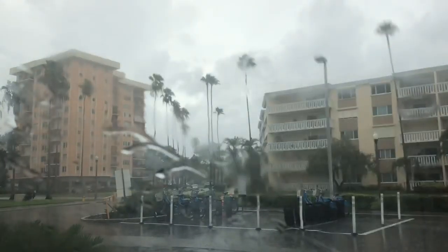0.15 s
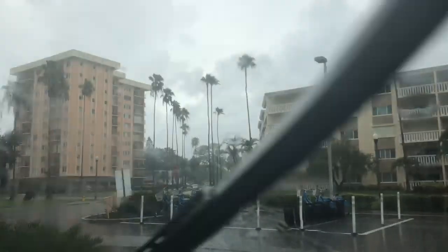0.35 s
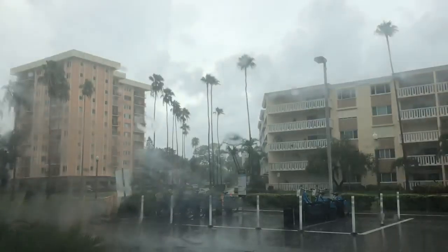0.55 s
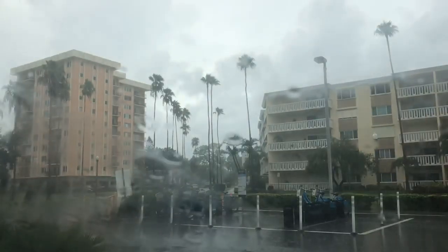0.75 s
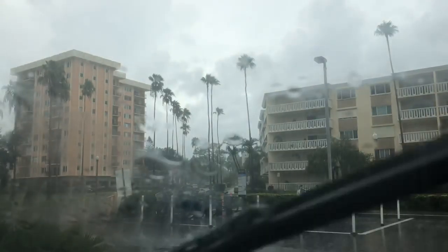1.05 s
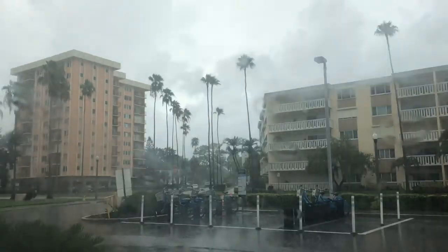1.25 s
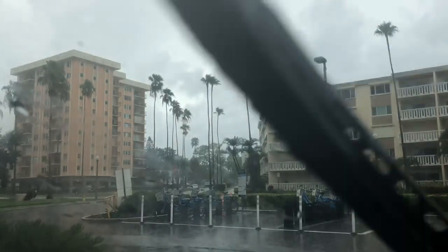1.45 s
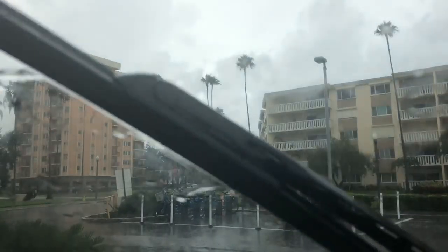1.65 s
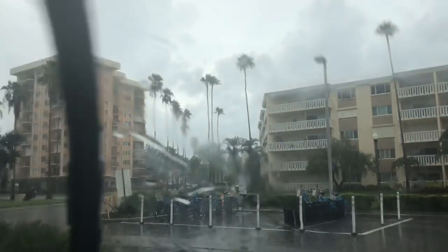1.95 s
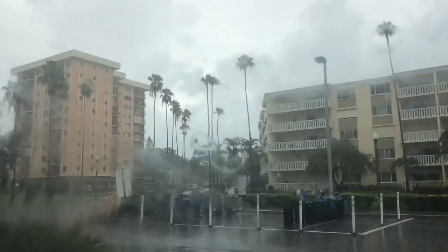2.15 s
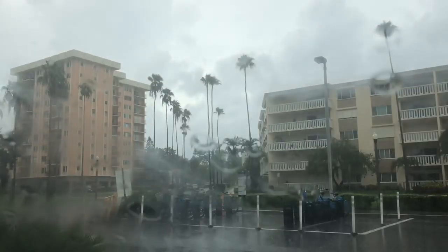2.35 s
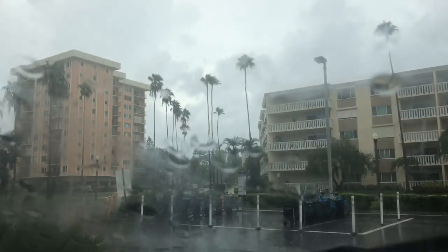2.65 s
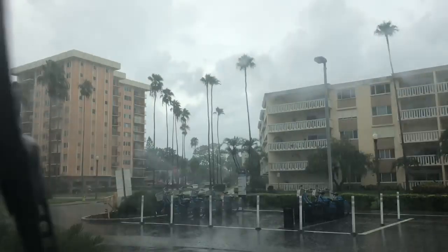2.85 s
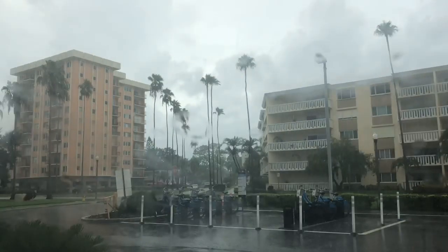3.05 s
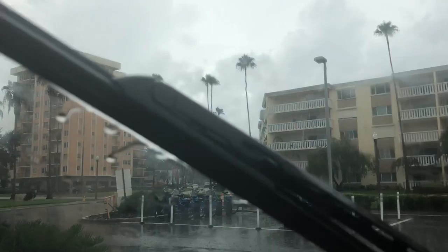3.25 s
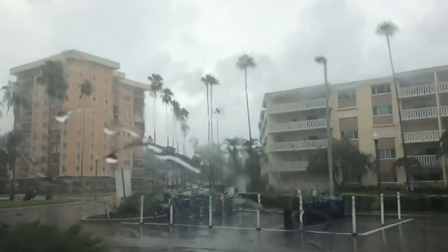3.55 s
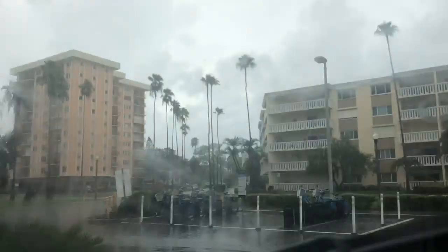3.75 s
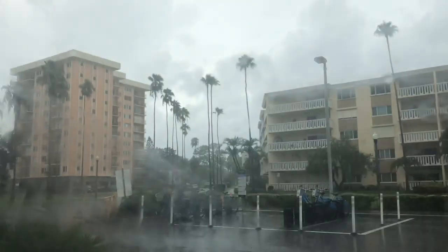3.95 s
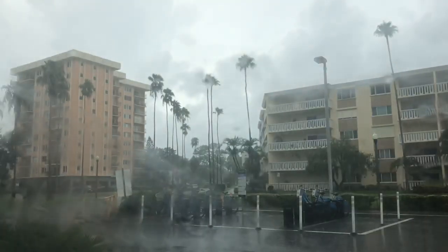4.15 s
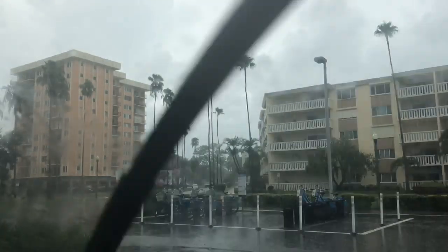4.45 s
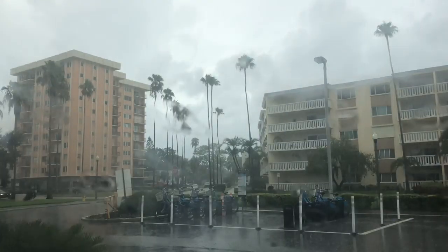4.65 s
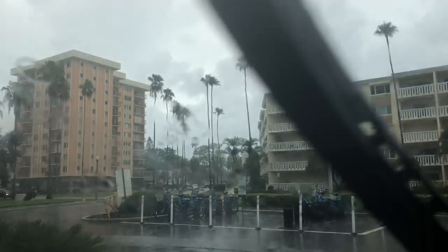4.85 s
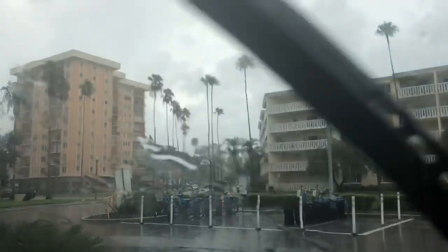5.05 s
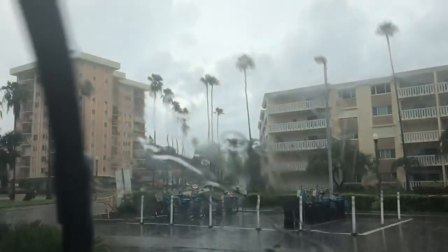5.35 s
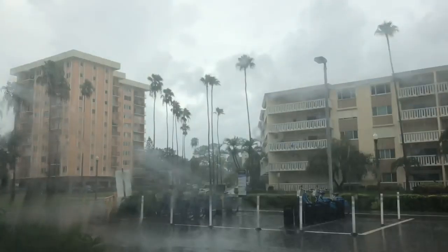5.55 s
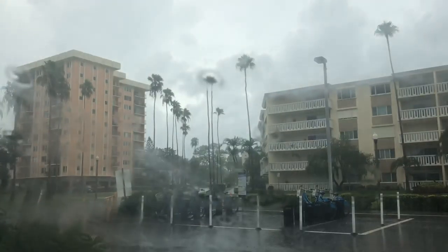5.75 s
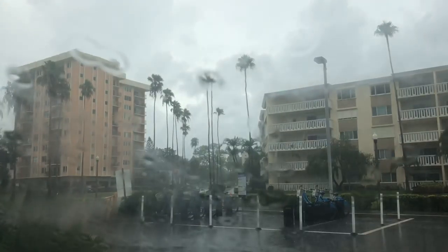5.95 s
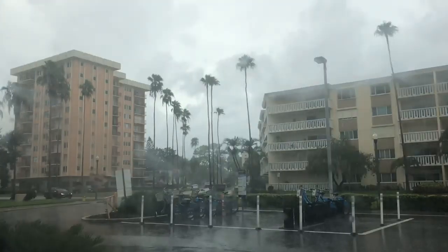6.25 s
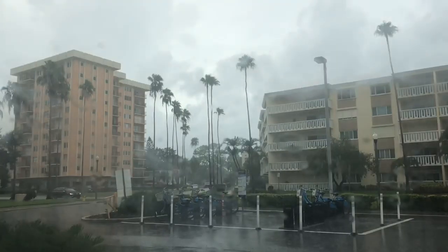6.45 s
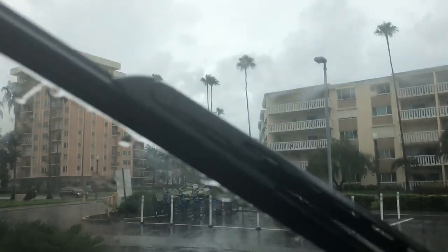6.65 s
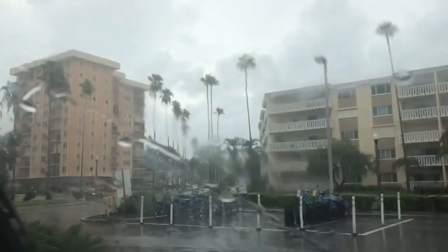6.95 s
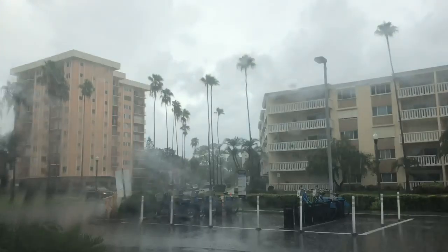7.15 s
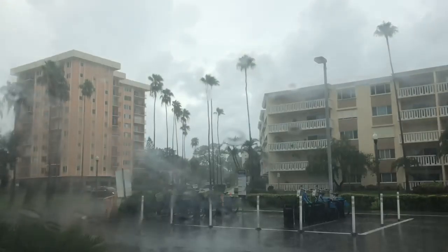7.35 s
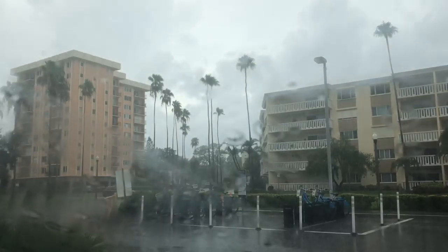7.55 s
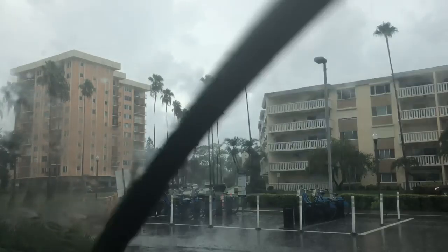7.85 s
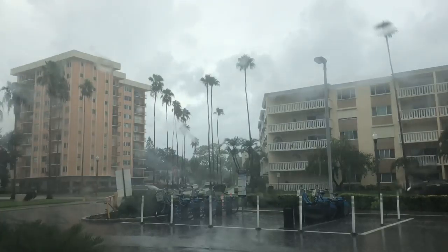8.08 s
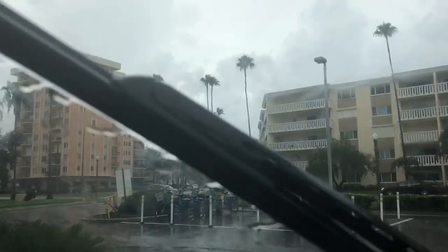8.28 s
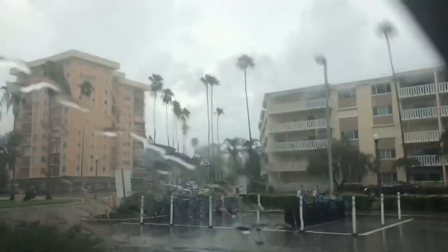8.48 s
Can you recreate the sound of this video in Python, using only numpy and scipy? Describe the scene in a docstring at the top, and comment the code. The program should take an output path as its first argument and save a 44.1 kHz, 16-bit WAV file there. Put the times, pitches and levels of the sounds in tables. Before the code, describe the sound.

Steady rain falls on a parked car, heard from the front seat. Small drops tick on the windshield and patter dully on the roof over a dense wash. The wipers run throughout in an even rhythm, swishing across the glass with a low motor hum and giving a muffled thump at each turn. Now and then a single heavy drop smacks the windshield.

```python
"""Steady rain on a parked car, heard from the front seat with the wipers running.
From the start, drops tick on the windshield and patter on the roof over a dense wash. Almost at once
the blades turn at the top: the rubber flips and the linkage thumps the car body. They swish down with
the motor humming, thump again at the foot of the glass, then drag back up as the first heavy drop
smacks the glass. The wipers repeat this about every 1.7 seconds, with more heavy drops now and then."""
import sys
import numpy as np
from scipy import signal
from scipy.fft import rfft, irfft, next_fast_len
from scipy.io import wavfile

SR = 44100
rng = np.random.default_rng(int(sys.argv[2]) if len(sys.argv) > 2 else 0)


def output_pcm(signal):
    """Save a mono or channel-first signal as 16-bit PCM at the path in sys.argv[1].

    Samples are clipped to [-1, 1] before scaling.
    """
    pcm = np.clip(np.atleast_2d(signal).T, -1, 1) * 32767
    wavfile.write(sys.argv[1], SR, np.round(pcm).astype(np.int16))


N = 424241
TIME = np.arange(N) / SR


def amp(db):
    """Turns decibels into a number to multiply by."""
    return 10 ** (np.asarray(db) / 20)


def unit(x):
    """Scales a signal to an average strength (rms) of 1."""
    return x / np.sqrt(np.mean(x ** 2) + 1e-20)


def add(mix, time_s, sound):
    """Lays a sound into the mix at the given time."""
    start = round(time_s * SR)
    sound = sound[max(-start, 0):]
    part = mix[max(start, 0):][:len(sound)]
    part += sound[:len(part)]


def colour(x, tone):
    """Makes low and high pitches louder or softer, following a tone table."""
    size = next_fast_len(len(x) + 4096, True)
    hz, db = np.transpose(tone)
    log_hz = np.log(abs(np.fft.fftfreq(size, 1 / SR)) + 1)
    log_gain = np.log(amp(np.interp(log_hz, np.log(hz), db)))
    response = np.exp(np.conj(signal.hilbert(log_gain)))  # rings after a hit, never before
    return irfft(rfft(x, size) * response[:size // 2 + 1], size)[:len(x)]


def noise(tone):
    """Steady noise of strength 1 with the given tone."""
    return unit(colour(rng.standard_normal(N), tone))


def gusts(fastest_hz, count=24):
    """Slow waves add up to a random rise and fall of strength 1."""
    t, hz = TIME[::128], fastest_hz * np.geomspace(1 / 20, 1, count)[:, None]
    waves = np.sin(2 * np.pi * (hz * t + rng.random((count, 1)))) / hz ** .25
    return np.interp(TIME, t, unit(waves.sum(0)))


def splash(crack_s, ring_s, ring_db):
    """One drop: a brief crack, then the panel and the cabin ring faintly."""
    t = np.arange(2048) / SR
    fade = np.exp(-t / crack_s) + amp(ring_db) * np.exp(-t / ring_s)
    burst = rng.standard_normal(len(t)) * fade
    return burst / np.linalg.norm(burst)


def landings(per_s, spread_db, cap):
    """One spike per drop, at random times; the biggest is cap * spread_db above the smallest."""
    sizes = amp(spread_db * np.minimum(rng.exponential(1, N), cap))
    return sizes * (rng.random(N) < per_s / SR)


def patter(drops, tone, spots=20, **shape):
    """Drops land on random spots that each ring in their own way."""
    spot = rng.integers(0, spots, N)
    hits = sum(signal.oaconvolve(drops * (spot == k), splash(**shape))[:N] for k in range(spots))
    return unit(colour(hits, tone))


# Tone of the wash: (pitch [Hz], level [dB]). Levels in all tables are relative.
WASH_TONE = [(25, -26), (60, -3.5), (150, 0.5), (320, 3), (480, 1.5), (720, -4.5), (840, -2), (1250, -5),
             (1450, -8.5), (3900, -11), (6000, -18), (9000, -31.5), (13000, -44), (16000, -40)]
def wash(gust):
    """The dense rush of rain behind the single drops."""
    return amp(-48 + 0.6 * gust) * noise(WASH_TONE)


# Tone of drops on the roof: (pitch [Hz], level [dB])
ROOF_TONE = [(150, -20.5), (300, 2), (500, 0), (850, 0), (1230, -3.5), (1420, -10), (2500, -14.5),
             (5000, -38.5)]
def roof_patter(gust):
    """Many drops drum dully on the roof."""
    drops = landings(per_s=550, spread_db=4, cap=3.1)
    return amp(-51.5 + gust) * patter(drops, ROOF_TONE, crack_s=0.0034, ring_s=0.015, ring_db=-15)


def roof_taps(gust, fade_s=0.0072, rise_s=0.0015, patches=16):
    """Heavier drops each ring one patch of the roof with a hollow note."""
    t = np.arange(2048) / SR
    drops = landings(per_s=26, spread_db=3, cap=2)
    patch, taps = rng.integers(0, patches, N), np.zeros(N)
    for k, hz in enumerate(np.geomspace(560, 1300, patches)):
        note = np.sin(2 * np.pi * hz * t) * np.exp(-t / fade_s) * (1 - np.exp(-t / rise_s))
        taps += signal.oaconvolve(drops * (patch == k), note)[:N]
    return amp(-57.5 + gust) * unit(taps)


# Tone of drops on the windshield: (pitch [Hz], level [dB])
GLASS_TONE = [(300, -5), (900, -1.5), (1500, 0.5), (2600, -0.5), (3700, -0.5), (4600, -4), (6500, -11),
              (9000, -15.5), (12500, -25), (16000, -43)]
def glass_ticks(gust):
    """Small drops tick on the windshield."""
    drops = landings(per_s=900, spread_db=4.5, cap=3.58)
    ticks = patter(drops, GLASS_TONE, crack_s=0.00041, ring_s=0.0059, ring_db=-6.5)
    return amp(-50 + 0.59 * gust) * ticks


# Tone of the spray: (pitch [Hz], level [dB])
SPRAY_TONE = [(1000, -12), (3000, -7), (6000, 2), (10000, -3), (16000, -7)]
def fine_spray(gust):
    """Fine spray lands with sharp, bright clicks."""
    drops = landings(per_s=200, spread_db=5, cap=4.2)
    return amp(-67 + 0.7 * gust) * patter(drops, SPRAY_TONE, crack_s=0.0003, ring_s=0.005, ring_db=-10)


# Where the roof and glass ring: (pitch [Hz], width [Hz], level [dB])
PANEL_NOTES = [(621, 51, -7.5), (831, 64, -2), (1026, 98, -6.5), (1255, 39, -4.5), (2440, 97, -22),
               (3605, 90, -5.5), (3930, 150, -17)]
def panels(x):
    """Roof and glass boost the rain at the pitches where they ring."""
    return x + sum(amp(db) * signal.lfilter(*signal.iirpeak(hz, hz / width, fs=SR), x)
                   for hz, width, db in PANEL_NOTES)


# How hard it rains: (time [s], level [dB])
RAIN_STRENGTH = [(0, 0.5), (.95, -1.05), (1.3, 1.5), (1.7, -.6), (3.1, -0.66), (5.2, 0.5), (6.8, -0.07),
                 (9.6, 0.34)]
def rain():
    """All layers of the steady rain rise and fall with the same gusts."""
    gust = gusts(fastest_hz=14)
    strength_db = np.interp(TIME, *np.transpose(RAIN_STRENGTH))
    layers = wash(gust) + roof_patter(gust) + glass_ticks(gust) + fine_spray(gust) + roof_taps(gust)
    return amp(strength_db) * panels(layers)


# Heavy drops on the windshield: (time [s], smack level [dB], spray level [dB])
HEAVY_DROPS = [(1.4626, -34, -50), (2.4246, -29, -48), (2.8125, -33, -54), (3.1685, -31.5, -59),
               (3.904, -30, -53), (4.0178, -39, -58), (4.9721, -48, -61), (5.9888, -31, -50),
               (6.1075, -30, -48), (6.132, -43, -50), (7.3997, -32, -46), (7.8332, -34, -58),
               (8.867, -27, -51), (8.9336, -32, -56), (9.179, -30.5, -55), (9.4213, -33, -59)]
def heavy_drops():
    """Single heavy drops smack the glass and burst into bright spray."""
    smack, spray = np.zeros(N), np.zeros(N)
    for time_s, smack_db, spray_db in HEAVY_DROPS:
        drop = splash(crack_s=0.00098, ring_s=0.0055, ring_db=-4)
        add(smack, time_s, amp(smack_db) * drop)
        add(spray, time_s, amp(spray_db) * drop)
    return amp(20) * colour(smack, GLASS_TONE) + amp(25) * colour(spray, SPRAY_TONE)


# The wipers keep strict time: first turn at the top, one trip down and back, the way down alone
FIRST_TURN_S, CYCLE_S, DOWN_S = 0.0523, 1.6858, 0.8215
# Tones of dragging rubber, the motor and swept water: (pitch [Hz], level [dB])
DRAG_TONE = [(20, -57), (45, -12), (80, -6.5), (105, -4.5), (120, 4), (145, -3.5), (200, -12), (400, -54.5)]
MOTOR_TONE = [(60, -29), (130, -14), (175, -3.5), (200, -1), (245, -10), (290, -11), (380, -20.5),
              (800, -52)]
SWISH_TONE = [(300, -31), (600, -7.5), (850, -5.5), (1250, 0.5), (1600, -13), (4000, -8.5), (9000, -56)]
# The stroke down, then up, at full speed: (drag level [dB], motor level [dB], swish level [dB])
STROKE_LEVELS = [(-58, -49, -58.5), (-46, -46, -65.5)]
# The rubber catches once a stroke: (time after the top turn [s], level [dB], half length [s])
RUBBER_CATCHES = [(0.273, -44, 0.04), (1.279, -43, .045)]
def wiper_sweep(grip_db=-45.5, strain_db=-43.5, ease_s=0.16):
    """A crank swings the blades: they swish at speed, then grip and strain the motor near each turn."""
    cycle_s = (TIME - FIRST_TURN_S) % CYCLE_S
    crank_angle = np.interp(cycle_s, [0, DOWN_S, CYCLE_S], [0, np.pi, 2 * np.pi])
    speed = abs(np.sin(crank_angle))
    going_up = (cycle_s > DOWN_S).astype(int)
    drag, motor, swish = amp(STROKE_LEVELS)[going_up].T
    from_turn_s = np.minimum(abs(cycle_s - DOWN_S), np.minimum(cycle_s, CYCLE_S - cycle_s))
    near_turn = np.exp(-(from_turn_s / ease_s) ** 2)
    judder = sum(amp(db) * np.exp(-((cycle_s - at_s) / half_s) ** 2)
                 for at_s, db, half_s in RUBBER_CATCHES)
    drag = drag * (1 - near_turn) + amp(grip_db) * near_turn + judder
    motor = motor * (1 - near_turn) + amp(strain_db) * near_turn
    return drag * noise(DRAG_TONE) + motor * noise(MOTOR_TONE) + swish * speed * noise(SWISH_TONE)


# Rubber scuffs and joint clacks: (time from the turn [s], level [dB], pitch [Hz], rise time [s])
TOP_RASPS = [(-.137, -39, 332, 0.0084), (-.002, -41, 780, 0.0084)]
FOOT_RASPS = [(-.108, -41.5, 400, 0.0063), (-0.0216, -41.5, 404, 0.011)]
def wiper_rasps(turns, rasps):
    """Short muffled rasps as the rubber edge flips over and the loose arm joint catches."""
    t, sound = np.arange(SR // 8) / SR, np.zeros(N)
    for delay_s, db, hz, rise_s in rasps:
        swell = np.zeros(N)
        for turn_s in turns:
            add(swell, turn_s + delay_s, t / rise_s * np.exp(1 - t / rise_s))
        band = signal.butter(3, [hz / 1.45, hz * 1.45], "bandpass", fs=SR, output="sos")
        sound += amp(db) * swell * unit(signal.sosfilt(band, rng.standard_normal(N)))
    return sound


# Rubber flips, arm stops, linkage bounces: (time from the turn [s], level [dB], contact time [s])
TOP_KNOCKS = [(-0.1372, -28, 0.0003), (-0.1199, -22.5, 0.0011), (-0.1042, -24, 0.0013),
              (-0.01, -23.5, 0.0053), (0.0006, -14, 0.0015), (0.0163, -20, 0.0028), (0.0304, -27.5, 0.0023)]
FOOT_KNOCKS = [(-0.1047, -28.5, 0.0009), (-0.085, -25, 0.013), (-0.016, -28, 0.00057),
               (0.0001, -11.5, 0.0057), (0.0174, -21, 0.004), (0.0999, -35, 0.0024),
               (0.1344, -26.5, 0.0036)]
# Notes of the glass, body and cabin at each end: (pitch [Hz], level [dB], time to fade by 60 dB [s])
TOP_NOTES = [(55.1, -23.5, 0.99), (84.2, -14.5, 0.41), (113.9, -11, 0.35), (150.8, 1.5, 0.16),
             (192.7, -0.5, 0.16), (194.6, -1.5, 0.17), (222, 2, 0.15), (295.8, -18.5, 0.21),
             (306, -2.5, 0.028), (556, -29.5, 0.061), (735, -11, 0.051)]
FOOT_NOTES = [(53, -27.5, 0.38), (92.8, -9, 0.34), (120, -6.5, 0.22), (143, -0.9, 0.062),
              (195.8, 7.5, 0.14), (194, 3, 0.11), (241, -8, 0.12), (316, -6, 0.095), (397, -8.5, 0.089),
              (524, -22, 0.04), (719, -19.5, 0.12)]
def wiper_thumps(turns, knocks, notes, gain_db, slack_s, uneven_db):
    """Soft knocks ring the car body; the hardest repeats exactly, lighter ones vary in time and level."""
    force, t = np.zeros(N), np.arange(SR // 2) / SR
    push_t = np.arange(-512, 513) / SR
    hardest_db = max(db for _, db, _ in knocks)
    for turn_s in turns:
        for delay_s, db, contact_s in knocks:
            time_luck, level_luck = rng.standard_normal(2)
            loose = 1 - amp(db - hardest_db)
            push = np.exp(-(np.pi * push_t / contact_s) ** 2)
            push *= amp(db + uneven_db * loose * level_luck) / push.sum()
            add(force, turn_s + delay_s + slack_s * loose * time_luck + push_t[0], push)
    # neighbouring notes swing opposite ways, so the thump takes a moment to build
    ring = sum((-1) ** k * amp(db - 60 * t / fade_s) * np.sin(2 * np.pi * hz * t)
               for k, (hz, db, fade_s) in enumerate(notes))
    return amp(gain_db) * signal.oaconvolve(force, ring)[:N]


def scene():
    """Rain and wipers, turning at the top and foot of the glass, mixed into one channel."""
    tops = np.arange(FIRST_TURN_S, N / SR, CYCLE_S)
    feet = np.arange(FIRST_TURN_S + DOWN_S, N / SR, CYCLE_S)
    thumps = wiper_thumps(tops, TOP_KNOCKS, TOP_NOTES, gain_db=-3, slack_s=0.00041, uneven_db=-3)
    thumps += wiper_thumps(feet, FOOT_KNOCKS, FOOT_NOTES, gain_db=1, slack_s=0.00035, uneven_db=-0.5)
    rasps = wiper_rasps(tops, TOP_RASPS) + wiper_rasps(feet, FOOT_RASPS)
    return (rain() + heavy_drops() + wiper_sweep() + rasps + thumps)[None]


def record(dry, lowest_hz=35, highest_hz=15900):
    """The microphone loses the deepest bass and the highest treble."""
    bass_cut = signal.butter(2, lowest_hz, "highpass", fs=SR, output="sos")
    treble_cut = signal.firwin(511, highest_hz, window=("kaiser", 9), fs=SR)
    return signal.oaconvolve(signal.sosfilt(bass_cut, dry), treble_cut[None], "same")


dry = scene()
out = record(dry)
output_pcm(out)
```